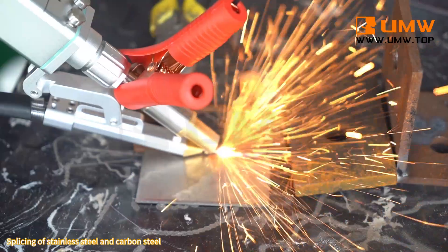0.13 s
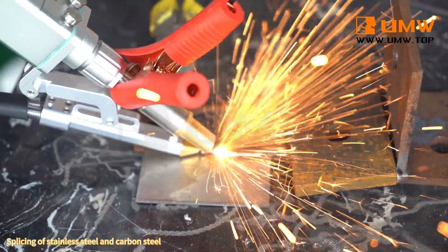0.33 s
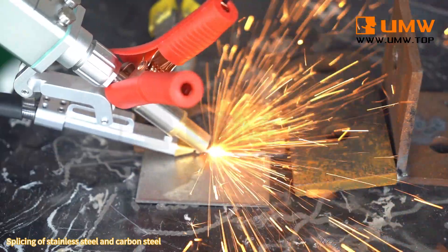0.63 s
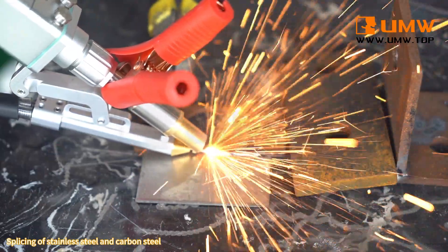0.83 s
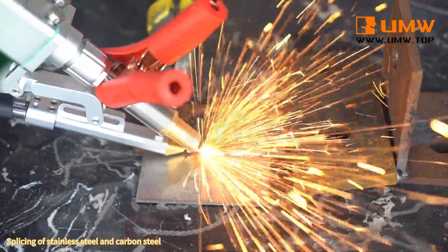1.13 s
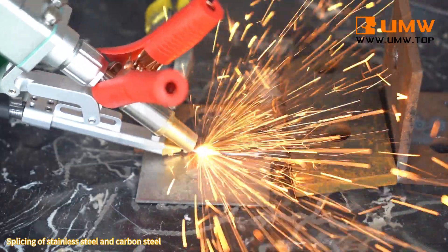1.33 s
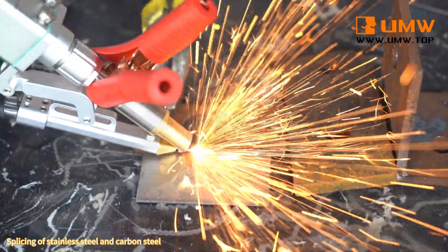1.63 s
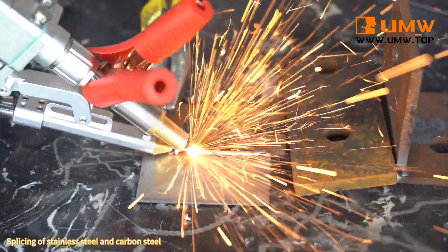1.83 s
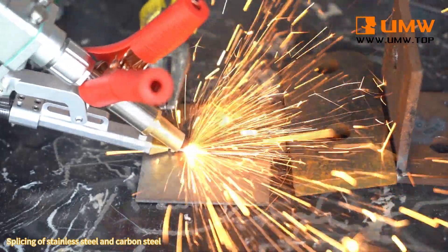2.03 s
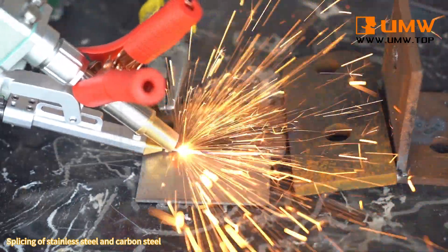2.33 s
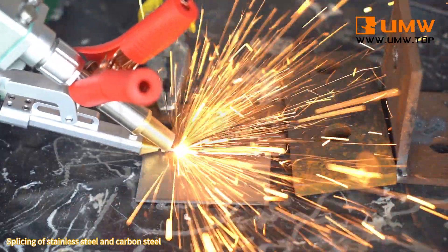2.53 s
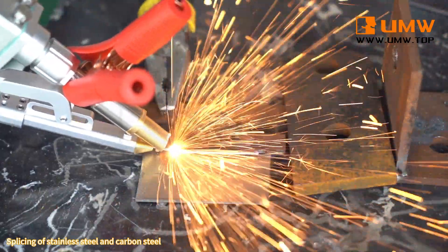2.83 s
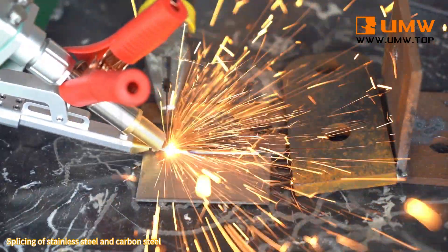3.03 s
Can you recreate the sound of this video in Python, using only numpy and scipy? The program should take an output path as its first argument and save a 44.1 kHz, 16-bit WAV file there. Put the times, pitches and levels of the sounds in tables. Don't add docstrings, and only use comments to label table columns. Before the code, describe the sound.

Loud continuous hiss of a hand-held laser welder, with fizzing metal and soft gas thumps close up.

```python
import sys
import numpy as np
from scipy import signal
from scipy.fft import rfft, irfft, next_fast_len
from scipy.io import wavfile
from scipy.ndimage import uniform_filter1d, map_coordinates

SR = 44100
rng = np.random.default_rng(int(sys.argv[2]) if len(sys.argv) > 2 else 0)


def volts_from_db(level):
    exponent = np.asarray(level, float) / 20
    return 10 ** exponent


def to_wav(sig):
    pcm = np.clip(np.atleast_2d(sig), -1, 1) * 32767
    pcm = np.round(pcm).astype(np.int16)
    wavfile.write(sys.argv[1], SR, pcm.T)


N = 139797
TIME = np.arange(N) / SR
SCAN_HZ = 98.8
LEFT_RIGHT = np.array([[1], [-1]])

# time in seconds, peak level in dB, pitch in Hz.
SWIRLS = [(0.298, -31.5, 300), (0.685, -27, 280), (1.335, -36, 258), (1.811, -30, 262), (2.048, -23, 335),
          (2.052, -21, 510), (2.197, -18, 350), (2.197, -26, 540), (2.204, -28, 317), (2.53, -39, 278),
          (2.73, -28, 394)]


def unit(x):
    return x / np.sqrt(np.mean(x ** 2) + 1e-20)


def along(points, hz):
    f, value = np.transpose(points)
    return np.interp(np.log(hz + 1), np.log(f + 1), value)


def curves(rows):
    seconds, *columns = np.transpose(rows)
    return [np.interp(TIME, seconds, column) for column in columns]


def wobble(rate):
    knots = rng.standard_normal(int(N * 200 / SR) + 4)
    return map_coordinates(knots, [TIME * rate])


def filtered(x, response):
    size = next_fast_len(N + 8192)
    spectrum = rfft(x, size) * response(np.fft.rfftfreq(size, 1 / SR))
    return irfft(spectrum, size)[..., :N]


def creeping(x, first, last):
    progress = np.linspace(0, 1, N)
    return (1 - progress) * filtered(x, first) + progress * filtered(x, last)


def resonant(modes, skirt, side=0, travel=0):
    def response(hz):
        power = 0
        for centre, width, db, *more in modes:
            change, lean = more or (0, 0)
            peak = volts_from_db(2 * (db + change * travel) + side * lean)
            detune = (centre ** 2 - hz ** 2) / (hz * width + 1)
            power = power + peak / (1 + detune ** 2) ** skirt
        return np.sqrt(power)
    return response


def patchy(quick_db, slow_db):
    z = signal.stft(rng.standard_normal((1, N)), nperseg=512)[2]

    def field(bins, frames):
        rough = rng.standard_normal(z.shape[1:])
        smooth = uniform_filter1d(rough, bins, 0)
        return unit(uniform_filter1d(smooth, frames, 1))

    gain = volts_from_db(quick_db * field(8, 8) + slow_db * field(4, 120))
    return signal.istft(z * gain, nperseg=512)[1][0, :N]


def steady(modes, skirt):
    x = filtered(rng.standard_normal(N), resonant(modes, skirt))
    power = np.abs(uniform_filter1d(x ** 2, round(0.11 * SR)))
    return x / np.sqrt(power + 1e-9)


def gas_jet():
    # centre in Hz, width in Hz, level in dB.
    tube = [(590, 78, -13), (783, 343, -13.5), (1510, 380, -16.5), (2670, 790, -17.5), (3570, 450, -15),
            (4380, 160, -16), (4674, 104, -5), (5097, 213, -7), (5370, 200, -8), (5714, 310, -8.5)]
    return unit(filtered(patchy(quick_db=1.26, slow_db=0.66), resonant(tube, 1.116)))


def whistle():
    # time in seconds, level in dB.
    swell = [(0.0, -23), (0.13, -27.5), (0.68, -24.5), (0.69, -21), (1.04, -27.5), (1.19, -22.5),
             (1.21, -28.5), (1.46, -23.5), (1.53, -30.5), (1.62, -25), (2.2, -27.5), (2.22, -34),
             (2.25, -23.5), (2.48, -28), (3.03, -23), (3.11, -34), (3.13, -23), (3.17, -27.5)]
    # centre in Hz, width in Hz, level in dB.
    lowest = [(1674, 117, 3), (1577, 134, -13.5)]
    # centre in Hz, width in Hz, level in dB at first, level in dB at last.
    upper = [(3107, 145, -28.5, -29.5), (5460, 114, -28.5, -27)]
    out = volts_from_db(curves(swell)[0] + 0.68) * steady(lowest, skirt=1.26)
    for centre, width, first_db, last_db in upper:
        level_db = np.linspace(first_db, last_db, N) + 1.05 * wobble(9.12)
        out = out + volts_from_db(level_db) * steady([(centre, width, 0)], skirt=1.08)
    return out


def plate_echo(x):
    # delay in seconds at first, delay in seconds at last.
    delay = [(1.79e-3, 1.775e-3), (1.77e-3, 1.782e-3)]
    late = []
    for port, (first_s, last_s) in zip(x, delay):
        position = np.arange(N) - SR * np.linspace(first_s, last_s, N)
        late.append(map_coordinates(port, [position], order=5, mode="mirror"))
    return x - 0.35 * np.array(late)


def plume(shared_db):
    # centre in turns, length in turns, gain in dB.
    dwells = [
        (.02, .3, 3.2),
        (.51, .17, 4.2),
    ]
    # centre in Hz, width in Hz, level in dB, change along the seam in dB,
    # lean to the right in dB.
    gap = [(6230, 250, -13, 9, 6), (6885, 210, 3.5, -3, 4.5), (7300, 210, -1.5, 4, 4),
           (7860, 220, -2, 2.2, 4), (8330, 220, -1.5, 7.5, 4.5), (8820, 160, -7, 5, 6),
           (9240, 280, -0.5, -2, 5), (10170, 220, -7, -10, 7), (10660, 380, -7, -3, 9),
           (11090, 360, -4, 1, 1), (11960, 320, -3.5, -7, 3), (12900, 500, -9, 5, -5),
           (13750, 470, -5, -5, 0), (14500, 400, -7.5, 0, 0)]
    # centre in Hz, width in Hz, time in seconds, length in seconds, extra gain.
    ringing = (9270, 130, 0.98, 0.7, 0.42)
    dwell_db = 0
    for turn, length, db in dwells:
        from_centre = (TIME * SCAN_HZ - turn + 0.5) % 1 - 0.5
        dwell_db = dwell_db + db * np.exp(-(from_centre / (length / 2)) ** 4)
    spit_db = shared_db + 0.39 * wobble(30.01) + 0.49 * wobble(90)
    sizzle = patchy(quick_db=-1.0, slow_db=0.02) * volts_from_db(dwell_db + spit_db)
    first = resonant(gap, 0.71, -LEFT_RIGHT, travel=-0.44)
    last = resonant(gap, 0.71, -LEFT_RIGHT, travel=0.58)
    out = unit(plate_echo(creeping(sizzle, first, last)))
    centre, width, at_s, for_s, extra = ringing
    ring = filtered(out, lambda hz: np.exp(-((hz - centre) / width) ** 2))
    return out + extra * np.exp(-((TIME - at_s) / for_s) ** 2) * ring


def scan_hum():
    # multiple of the scan rate, rms level in dB.
    tones = [(2, -66), (4, -63), (5, -54), (6, -56), (7, -50), (9, -49), (10, -55), (12, -55)]
    out = 0
    for multiple, db in tones:
        peak = volts_from_db(db + 3 + wobble(3))
        out = out + peak * np.sin(2 * np.pi * (multiple * SCAN_HZ * TIME + rng.random()))
    return out


def to_ports(x):
    # centre in Hz, width in Hz, depth in dB at first, depth in dB at last.
    dips = [(1046, 144, 5, 4.5), (1986, 110, 5.5, 7), (2780, 86, 3.5, 4.9), (3865, 75, 11, 3.5),
            (3940, 64, -7, 13), (4440, 48, -2, 4), (7540, 95, 4.5, 4.6), (8570, 99, 3.5, 3),
            (12230, 170, 6, 5.4), (15100, 400, 0, 2.5)]
    lag_s, low_cut_hz, slope = 8.5e-6, 493, 2.06

    def path(hz, end):
        depth_db = sum(db[end] * np.exp(-((hz - c) / width) ** 2) for c, width, *db in dips)
        low_cut = 1 / np.sqrt(1 + (low_cut_hz / (hz + 1)) ** (2 * slope))
        lag = np.exp(1j * np.pi * hz * lag_s * LEFT_RIGHT)
        return volts_from_db(-depth_db) * low_cut * lag

    return creeping(x, lambda hz: path(hz, 0), lambda hz: path(hz, 1))


def welding_head():
    # time in seconds, gas jet level in dB, plume level in dB.
    flow = [(0.0, -21.5, -21), (0.22, -18.5, -21.5), (0.68, -21.5, -21), (0.69, -20, -21),
            (0.9, -18.5, -20.5), (1.13, -20, -21), (1.93, -19.5, -20.5), (2.0, -21, -21.5),
            (2.77, -20, -20), (3.04, -22.5, -22), (3.05, -22.5, -21.5), (3.17, -20, -19.5)]
    jet_db, plume_db = curves(flow)
    shared_db = 0.5 * wobble(17)
    jet = volts_from_db(jet_db - 3.0 + shared_db) * gas_jet()
    singing = volts_from_db(0.64 * shared_db) * whistle()
    sizzle = volts_from_db(plume_db + 1.42) * plume(shared_db)
    return to_ports(singing + jet + sizzle) + scan_hum()


def workshop():
    # centre in Hz, width in Hz, level in dB.
    bench = [(700, 420, -19), (1560, 300, -6), (2160, 290, -2), (3130, 410, 5), (4570, 460, 6),
             (5300, 280, 7), (7060, 310, 5.5), (7900, 400, -5), (8450, 400, 0), (9270, 400, 6),
             (10900, 820, -6), (12000, 620, 2), (13800, 1200, -5.5), (14900, 710, -2)]
    # frequency in Hz, level in dB per Hz.
    machines = [(15, -76), (25, -25), (161, -12), (188, -4), (226, -7), (450, -6.5), (580, -27),
                (990, -120)]
    echo = unit(filtered(patchy(quick_db=1.0, slow_db=1.5), resonant(bench, 1.5)))
    far = unit(filtered(rng.standard_normal(N), lambda hz: volts_from_db(along(machines, hz))))
    return volts_from_db(-26.5) * echo * LEFT_RIGHT + volts_from_db(-61.5) * far


def rolling_gusts():
    # start in seconds, hold in seconds, level in dB.
    gusts = [(0.291, 0.042, -41.5), (0.412, 0.041, -54), (0.545, 0.033, -47.5), (0.654, 0.11, -39),
             (0.988, 0.079, -50), (1.14, 0.13, -46), (1.27, 0.072, -43), (1.43, .07, -59),
             (1.791, 0.032, -40.5), (1.863, 0.12, -46), (1.972, 0.085, -45.5), (2.15, 0.033, -47),
             (2.192, 0.1, -43), (2.502, 0.12, -53), (2.727, 0.036, -43.5), (2.804, .1, -57),
             (3.111, .06, -42.5)]
    # frequency in Hz, level in dB per Hz.
    rumble = [(15, -50), (40, -33), (70, -15.5), (120, -6.5), (250, -3.5), (400, -5.5), (700, -11.5),
              (1200, -50)]
    rise_s, fall_s, common = 0.0042, 0.043, 0.54
    strength = 0
    for start, hold, db in gusts:
        rise = np.clip((TIME - start) / rise_s, 0, 1)
        fall = np.exp(-np.clip(TIME - start - hold, 0, 9) / fall_s)
        strength = strength + volts_from_db(db) * rise * fall
    lumps = filtered(rng.standard_normal((3, N)), lambda hz: volts_from_db(along(rumble, hz)))
    own = filtered(lumps[1:], lambda hz: hz / np.hypot(hz, 220))
    roll = common * lumps[0] + (1 - common) * own
    return strength * unit(roll * volts_from_db(1.2 * wobble(39.84)))


def swirl_thumps():
    out = 0
    for at_s, db, hz in SWIRLS:
        late = TIME - at_s
        out = out + volts_from_db(db) * np.exp(-(late * hz / 1.03) ** 2) * np.cos(2 * np.pi * hz * late)
    return out


def torn_puffs():
    # frequency in Hz, level in dB per Hz.
    torn = [(200, -30), (450, 2), (900, -7), (1300, -14), (1700, -60)]
    strength = sum(volts_from_db(db - 11.5 - 6 * ((TIME - at_s) / 0.006) ** 2) for at_s, db, _ in SWIRLS)
    noise = unit(filtered(rng.standard_normal(N), lambda hz: volts_from_db(along(torn, hz))))
    return strength * noise * LEFT_RIGHT


def buffet():
    part = lambda hz: np.exp(1j * 1.22 * LEFT_RIGHT / 2 * np.clip(hz / 350, 0, 1))
    return filtered(rolling_gusts() + swirl_thumps(), part) + torn_puffs()


def scene():
    return welding_head() + workshop() + buffet()


def low_pass(x):
    return signal.sosfilt(signal.butter(12, 15730, fs=SR, output="sos"), x)


def record(dry):
    limited = filtered(dry, lambda hz: hz < 15735)
    return low_pass(limited)


dry = scene()
out = record(dry)
to_wav(out)
```